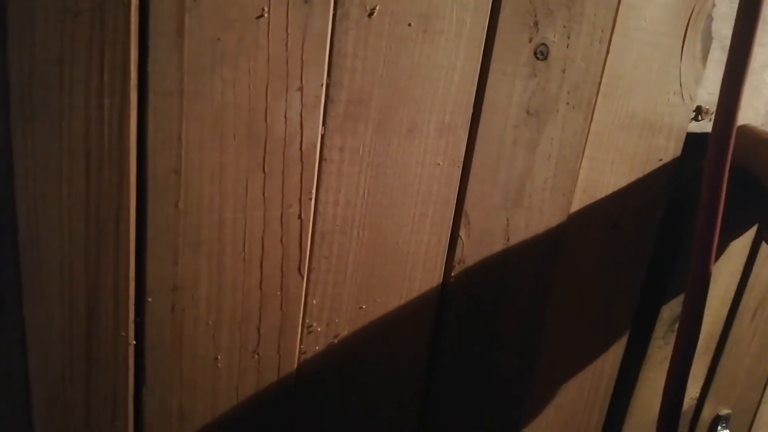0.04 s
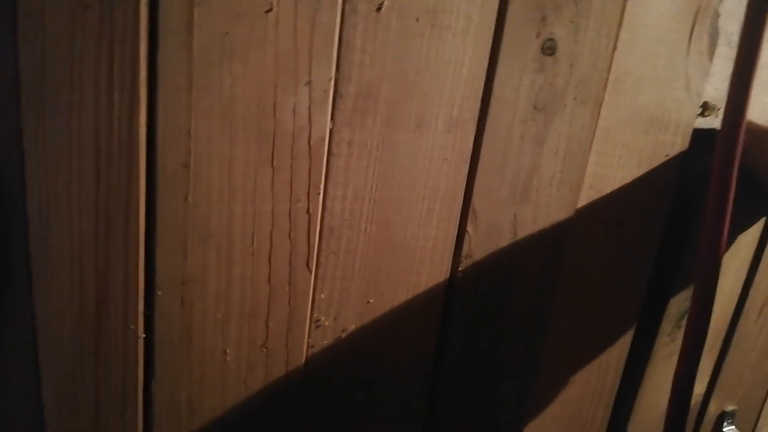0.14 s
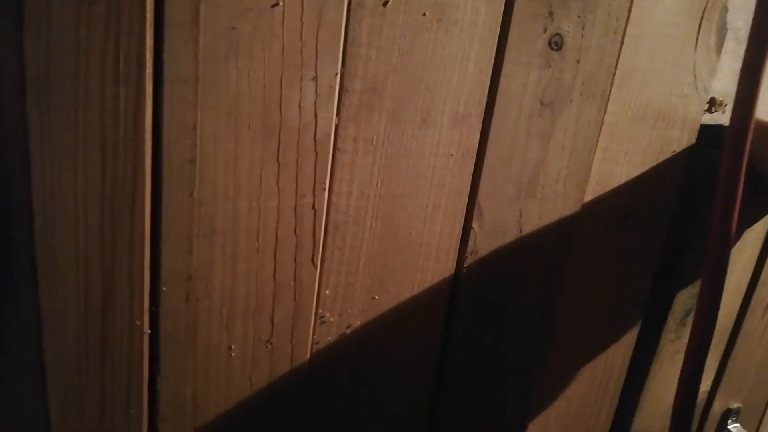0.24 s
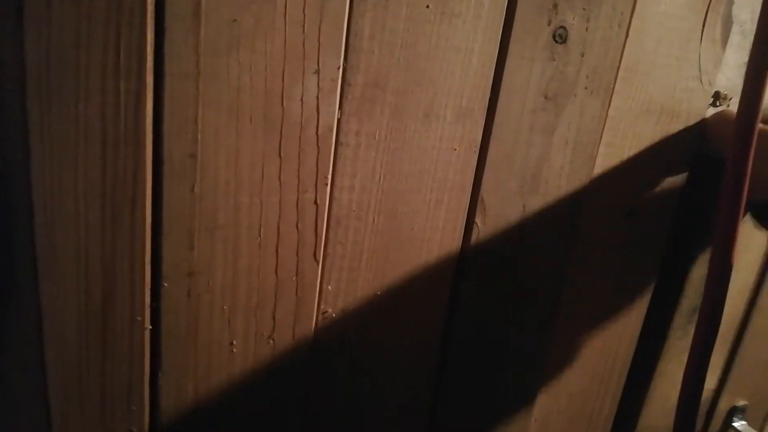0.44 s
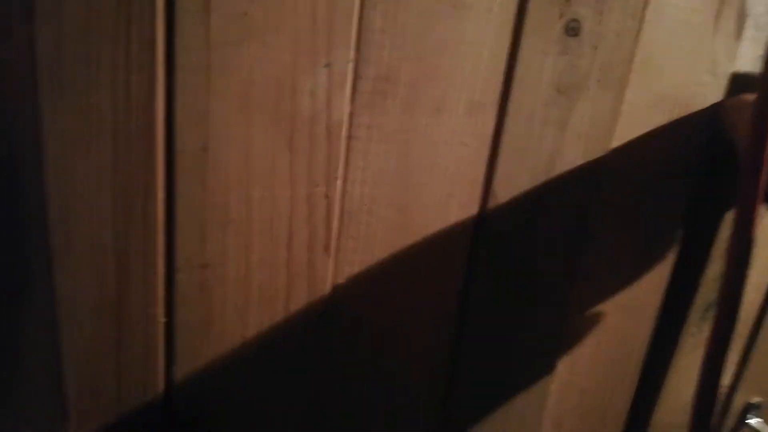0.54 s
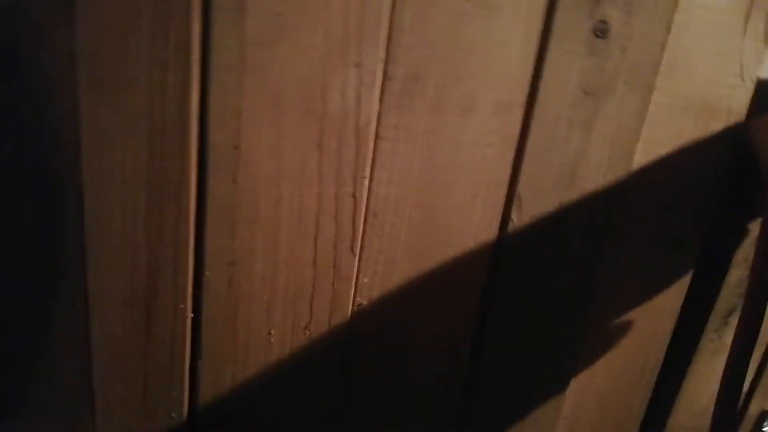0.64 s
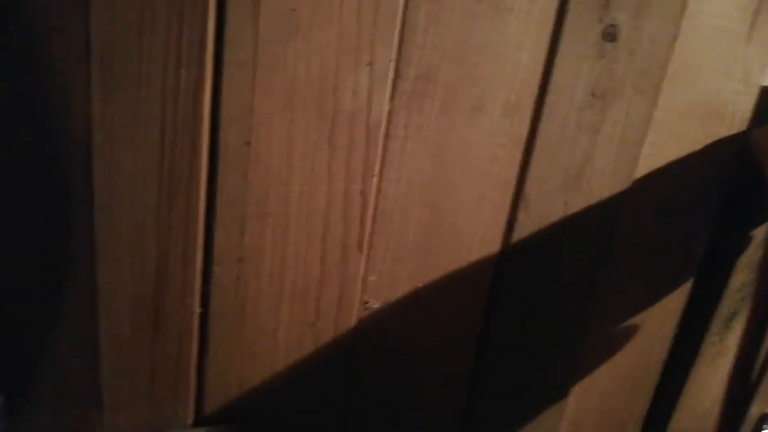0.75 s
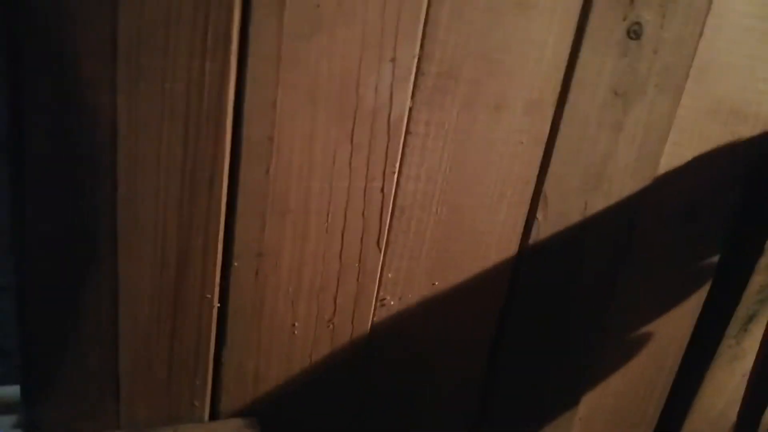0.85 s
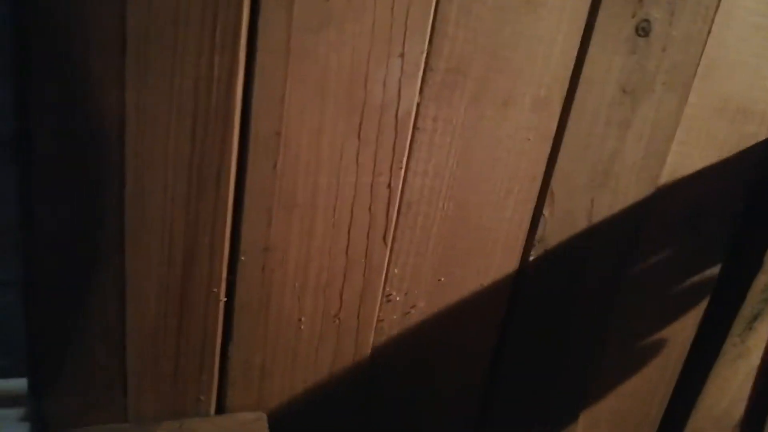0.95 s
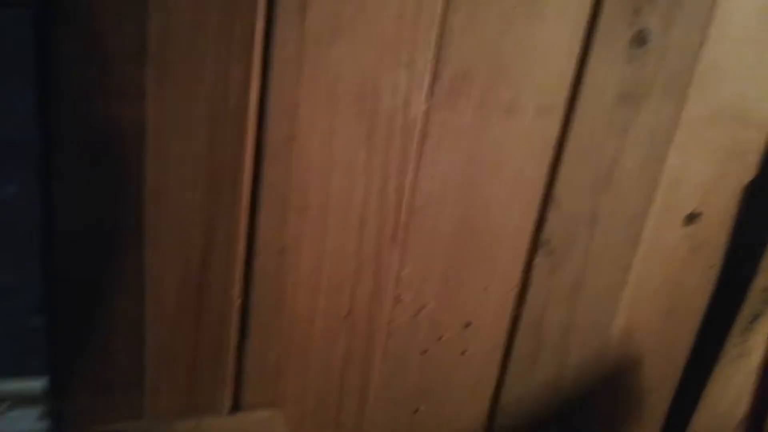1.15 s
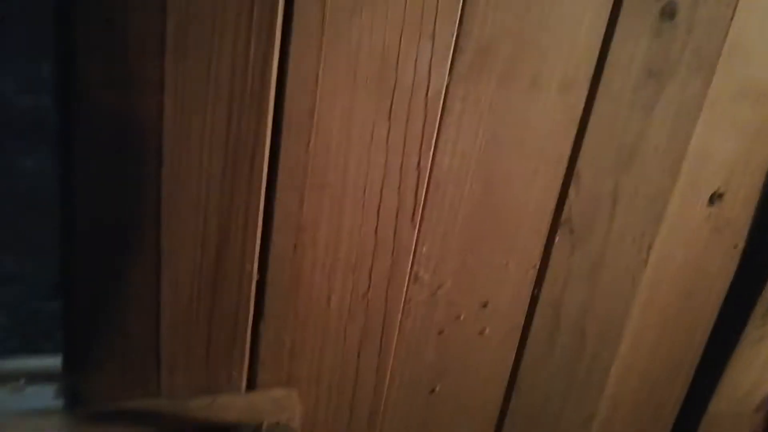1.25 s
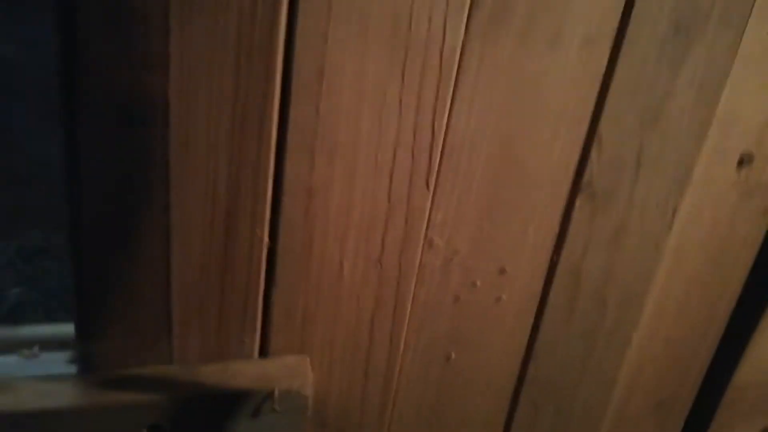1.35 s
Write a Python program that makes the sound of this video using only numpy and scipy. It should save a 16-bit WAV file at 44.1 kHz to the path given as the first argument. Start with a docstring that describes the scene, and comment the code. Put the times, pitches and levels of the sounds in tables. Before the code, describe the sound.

Close metal latch rattling open on a wooden door, followed by a few dull knocks.

```python
"""A metal latch is worked on a wooden coop door, close by, outdoors at night.
Impacts excite its steel modes as it ticks and snaps open; sliding friction makes the bolt rub and
scrape clear. The planks knock in their damped modes and the door shudders free. Stick-slip motion
makes its edge and hinges squeak, and a sleeve swishes as the arm pulls, over quiet night air."""
import sys
import numpy as np
from scipy import signal
from scipy.fft import rfft, irfft
from scipy.io import wavfile
from scipy.ndimage import uniform_filter1d

SR = 44100
rng = np.random.default_rng(int(sys.argv[2]) if len(sys.argv) > 2 else 0)


def inscribe(sig):
    """Save sig as 16-bit PCM at rate SR to the path in sys.argv[1].

    A 1-D sig is mono; a 2-D sig holds one channel per row.
    Samples are clipped to [-1, 1] before scaling.
    """
    pcm = np.round(np.clip(np.atleast_2d(sig).T, -1, 1) * 32767)
    wavfile.write(sys.argv[1], SR, pcm.astype(np.int16))


N = 61739
T = np.arange(N) / SR

# likeness of noise at the two ears: (frequency [Hz], coherence [0-1])
COHERENCE = [(60, 1), (150, 0.93), (350, 0.1), (4000, 0)]
# night air: (frequency [Hz], spectral density [dB])
AIR_SPECTRUM = [(45, 2.5), (115, -1), (180, -7), (350, -8.5), (800, -16), (2200, -17), (8000, -20),
                (15500, -28.5)]
# ring of the coop wall: (frequency [Hz], T60 [s])
WALL_DECAY = [(200, 0.26), (1500, 0.12), (4000, 0.11), (9000, 0.081), (15000, 0.2)]
# arm movement: (time [s], level [dB], left minus right [dB], treble gain [dB])
SLEEVE_MOTION = [(0, -56, -0.5, -24), (0.191, -63.5, 0.5, -5), (.28, -71, -3, -4), (.55, -55.5, 1.5, -5.5),
                 (0.687, -58.5, -3.5, 7), (0.768, -65.5, 1.5, -2.5), (0.824, -57, -1, -0.5),
                 (0.851, -61, -1, 1.5), (.93, -61, -1.5, 2), (1.1, -53.5, -2.5, 1.5), (1.25, -55, -1, -2),
                 (1.4, -59.5, -0.5, -4.5)]
# rubbing cloth: (frequency [Hz], level [dB])
SLEEVE_SPECTRUM = [(200, -14), (1300, -3), (2200, -10.5), (4200, -1.5), (6000, -3.5), (7800, -0.5),
                   (9400, -1), (10700, -6), (15500, -18)]
# the door's edge groans, then squeaks at two spots; the hinges rub faintly:
# (start [s], duration [s], level [dB], start pitch [Hz], end pitch [Hz], rms waver [Hz])
SQUEAK_GLIDES = [(0.085, 0.11, -54.5, 130, 97, 40.2), (0.47, 0.01554, -36.5, 380, 1050, 129.4),
                 (0.472, 0.0208, -44, 900, 1352, 199), (1.009, 0.081, -63.5, 1285, 1316, 140),
                 (1.116, 0.077, -62, 1252, 1320, 120), (1.15, 0.18, -65.5, 2900, 3166, 189)]
# blows on the planks: (time [s], level [dB], contact time [s])
PLANK_BLOWS = [(0.221, -54, 0.0029), (0.433, -44, 0.0044), (0.4695, -41.5, 0.0011), (.484, -39.5, 0.002),
               (0.493, -40, 0.0034), (0.52, -39.5, 0.0063), (0.5632, -33.5, 0.003), (0.5806, -29, 0.0046),
               (.6095, -34, 0.005)]
# door resonances: (frequency [Hz], level [dB], T60 [s])
DOOR_MODES = [(113.5, -3, 0.2), (150, -6.5, 0.13), (191.6, -2.5, 0.076), (249, -5.5, 0.06),
              (323, -15, 0.081), (438, -10, 0.11), (526, 3.5, 0.034), (730, -6, 0.037)]
# vibration of the freed door: (time [s], level [dB])
SHUDDER_ENVELOPE = [(.5135, -56), (.575, -39.5), (.610, -29.5), (.64, -36.5), (.668, -52.5), (.71, -48.5),
                    (.755, -63)]
# bolt sliding in its guide: (time [s], level [dB])
SLIDE_ENVELOPE = [(.332, -72), (.345, -49.5), (.356, -45), (.392, -40.5), (.408, -48), (.45, -55),
                  (.46, -61)]
# friction in the guide: (frequency [Hz], level [dB])
SLIDE_SPECTRUM = [(60, -2), (1100, -2.5), (4200, 0.5), (5600, -2.5), (7600, 1), (10500, -5), (12500, -15),
                  (16000, -30)]
# bolt resonances: (frequency [Hz], bandwidth [Hz], level [dB])
BOLT_MODES = [(1617, 77, -4)]
# bolt clearing its keeper: (time [s], level [dB])
SCRAPE_ENVELOPE = [(.4525, -44), (.457, -43.5), (.468, -35), (.49, -39), (.51, -45), (.55, -55), (.62, -70)]
# friction at the keeper: (frequency [Hz], level [dB])
SCRAPE_SPECTRUM = [(300, -5), (1100, -0.5), (2200, -1.5), (4100, -3), (7500, 0), (8250, 4), (9000, -2.5),
                   (11500, -5.5), (15500, -24)]
# treble loss on indirect paths: (frequency [Hz], gain [dB])
INDIRECT_LOSS = [(9000, -0.5), (13000, -5)]
# reflections from nearby boards: (delay [s], left gain [dB], right gain [dB])
BOARD_ECHOES = [(.0024, -29, -20), (.0031, -15.5, -18), (.0047, -32, -20.5), (0.0123, -36, -19)]
# latch impacts, with one sharp return from the boards (0.4226 s, 3 ms after the 0.4194 s strike): (time [s],
# tick level [dB], ring level [dB], ring pitch [ratio], tick cutoff [Hz])
LATCH_STRIKES = [(0.21, -6.5, -24.5, 0.98, 11500), (0.4109, -1.5, -5, 1.067, 16400),
                 (0.413, -7, -17, 1.45, 8500), (0.4194, -30, -16.5, 0.997, 9600),
                 (0.4226, -15.5, -20, 1.4, 10900), (0.4530, -10.5, -15.5, 0.978, 15400),
                 (0.4601, -14, -21, 1.004, 16000), (0.4686, -32, -18.5, 1.5, 10700)]
# metal meeting metal: (frequency [Hz], level [dB])
TICK_SPECTRUM = [(650, -26.5), (1000, -9.5), (1500, 0.5), (2600, -21.5), (4000, 6), (5200, 2), (8200, 9.5),
                 (8800, 4), (9800, 10), (10900, 2), (13200, -4), (15500, -12.5)]
# steel resonances: (frequency [Hz], level [dB], T60 [s])
LATCH_MODES = [(4320, -2.5, 0.0083), (4660, -13.5, 0.0068), (4360, -42, 0.05), (4834, -49, 0.05),
               (4230, -32, 0.1), (6150, -13.5, 0.013), (1770, -48, 0.0065)]


def amp(db):
    """Decibels to amplitude ratio."""
    return 10 ** (np.asarray(db) / 20)


def unit_rms(x):
    """Normalisation to unit power."""
    return x / np.sqrt(np.mean(x ** 2) + 1e-20)


def at_frequency(points, hz):
    """Interpolation on a log-frequency axis."""
    knots, values = np.transpose(points)
    return np.interp(np.log(hz + 1), np.log(knots + 1), values)


def envelope(points):
    """Amplitude along a decibel curve, zero outside it."""
    times, db = np.transpose(points)[:2]
    return amp(np.interp(T, times, db)) * (T >= times[0]) * (T <= times[-1])


def delay(x, seconds):
    """Time shift, padded to the scene's length."""
    return np.concatenate([np.zeros(max(round(seconds * SR), 0)), x, np.zeros(N)])[:N]


def butterworth(x, kind, hz, order):
    """Maximally flat high-pass or low-pass filtering."""
    return signal.sosfilt(signal.butter(order, hz, kind, fs=SR, output="sos"), x)


def colour(x, spectrum):
    """Minimum-phase filtering: the phase follows from the log magnitude."""
    hz = abs(np.fft.fftfreq(2048, 1 / SR))
    log_gain = np.log(amp(at_frequency(spectrum, hz)))
    response = np.exp(np.conj(signal.hilbert(log_gain)))
    taps = np.fft.ifft(response).real[:1024]
    return signal.fftconvolve(x, taps)[:len(x)]


def ring(modes, ratio=1):
    """Modal superposition: a struck body sounds as a sum of damped sinusoids."""
    t = T[:SR // 2]
    return sum(amp(db - 60 * t / t60) * np.sin(2 * np.pi * hz * ratio * t) for hz, db, t60 in modes)


def diffuse(noise_pair, spectrum):
    """Coloured noise with interaural coherence: long waves reach both ears alike."""
    hz = np.fft.rfftfreq(N, 1 / SR)
    coherence = at_frequency(COHERENCE, hz)
    mid, side = rfft(noise_pair) * np.sqrt([1 + coherence, 1 - coherence])
    ears = np.array([mid + side, mid - side])
    return unit_rms(irfft(ears * amp(at_frequency(spectrum, hz)), N))


def friction(slips_per_s, uneven_db, smooth_gain):
    """Friction noise: a Poisson train of tiny, uneven slips over a smooth rub."""
    sizes = amp(uneven_db * np.minimum(rng.exponential(1, N), 4))
    slipping = rng.random(N) < slips_per_s / SR
    slips = unit_rms(sizes * slipping * rng.standard_normal((2, N)))
    return slips + smooth_gain * rng.standard_normal((2, N))


def night_air():
    """Stationary ambient noise, strongest in the bass."""
    return amp(-63) * diffuse(rng.standard_normal((2, N)), AIR_SPECTRUM)


def wall_tail(x, onset_s=0.00028):
    """Reverberation from the boards: each band decays exponentially, in a tail unique to each ear."""
    hz, t, bands = signal.stft(rng.standard_normal((2, SR // 3)), SR, nperseg=128)
    decay = amp(-60 * t / at_frequency(WALL_DECAY, hz)[:, None])
    _, tail = signal.istft(bands * decay, SR, nperseg=128)
    tail *= np.minimum(T[:tail.shape[1]] / onset_s, 1)
    return signal.fftconvolve(x[None], tail / np.linalg.norm(tail[0]), axes=1)[:, :N]


def sleeve():
    """Friction of cloth on cloth gives broadband noise, brighter in the arm's quick stroke."""
    times, _, pan_db, treble_db = np.transpose(SLEEVE_MOTION)
    left_db = np.interp(T, times, pan_db) / 2
    cloth = diffuse(friction(slips_per_s=2500, uneven_db=3.5, smooth_gain=1.68), SLEEVE_SPECTRUM)
    treble = signal.sosfiltfilt(signal.butter(2, 7500, "high", fs=SR, output="sos"), cloth)
    treble_gain = amp(np.interp(T, times, treble_db))
    return envelope(SLEEVE_MOTION) * amp([left_db, -left_db]) * (cloth + (treble_gain - 1) * treble)


def squeaks():
    """Stick-slip oscillation of dry surfaces: unsteady tones that swell, glide and fade."""
    tones = np.zeros(N)
    for start, duration, db, start_hz, end_hz, waver_hz in SQUEAK_GLIDES:
        progress = np.clip((T - start) / duration, 0, 1)
        waver = unit_rms(uniform_filter1d(rng.standard_normal(N), size=40))
        hz = start_hz + (end_hz - start_hz) * progress + waver_hz * waver
        swell = np.sin(np.pi * progress) ** 2
        tones += amp(db) * swell * np.sin(2 * np.pi * np.cumsum(hz) / SR)
    return tones


def door(shudder_hz=46.26):
    """Impact excitation: longer contacts drive only the low plank modes. The freed door shudders."""
    force = np.zeros(N)
    for start, db, contact_s in PLANK_BLOWS:
        pulse = np.sin(np.pi * np.minimum(T[:2048] / contact_s, 1)) ** 2
        force += amp(db) * delay(pulse / pulse.sum(), start)
    vibration = signal.fftconvolve(force, ring(DOOR_MODES))[:N]
    planks = butterworth(vibration, "high", hz=40.7, order=4)
    since_freed = T - SHUDDER_ENVELOPE[0][0]
    shudder = envelope(SHUDDER_ENVELOPE) * np.sin(2 * np.pi * shudder_hz * since_freed)
    tail = amp(1.5) * wall_tail(butterworth(planks, "high", hz=333, order=2))
    return planks + shudder + tail


def bolt():
    """Sliding friction drives the bolt's resonance in its guide; it then scrapes past the keeper."""
    rub = friction(slips_per_s=3000, uneven_db=1, smooth_gain=0.96)
    slide = diffuse(rub, SLIDE_SPECTRUM)
    for hz, bandwidth, db in BOLT_MODES:
        resonator = signal.iirpeak(hz, hz / bandwidth, SR)
        slide += amp(db) * unit_rms(signal.lfilter(*resonator, rub))
    scrape = diffuse(friction(slips_per_s=2500, uneven_db=0.5, smooth_gain=1.0), SCRAPE_SPECTRUM)
    return envelope(SLIDE_ENVELOPE) * slide + envelope(SCRAPE_ENVELOPE) * scrape


def latch(left_lag_s=0.00022, left_shadow_db=-3):
    """Impacts tick and excite steel modes; interaural time and level cues place them on the right."""
    tick = colour(signal.unit_impulse(1024), TICK_SPECTRUM)
    strikes = np.zeros(N)
    for start, tick_db, ring_db, ratio, cutoff_hz in LATCH_STRIKES:
        strikes += amp(tick_db) * delay(butterworth(tick, "low", cutoff_hz, order=4), start)
        strikes += amp(ring_db) * delay(ring(LATCH_MODES, ratio), start)
    direct = butterworth(strikes, "high", hz=970, order=4)  # a small body radiates little bass
    indirect = colour(direct, INDIRECT_LOSS)
    ears = np.array([amp(left_shadow_db) * delay(indirect, left_lag_s), direct])
    for lag_s, left_db, right_db in BOARD_ECHOES:
        ears += np.outer(amp([left_db, right_db]), delay(indirect, lag_s))
    return ears + amp(-4.5) * wall_tail(indirect)


def scene():
    """Linear superposition: the pressures of all sources add at each ear."""
    return latch() + bolt() + door() + squeaks() + sleeve() + night_air()


def record(dry, cutoff_hz=16100):
    """Band limiting by a linear-phase low-pass filter."""
    taps = signal.firwin(511, cutoff_hz, window=("kaiser", 9), fs=SR)
    return signal.oaconvolve(dry, taps[None], "same")


dry = scene()
out = record(dry)
inscribe(out)
```